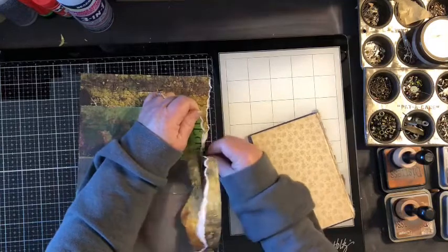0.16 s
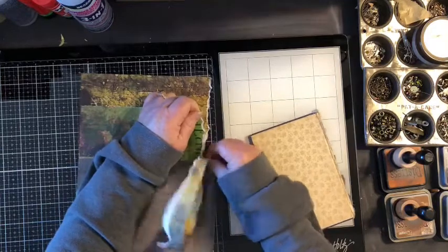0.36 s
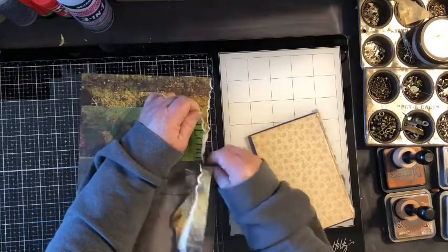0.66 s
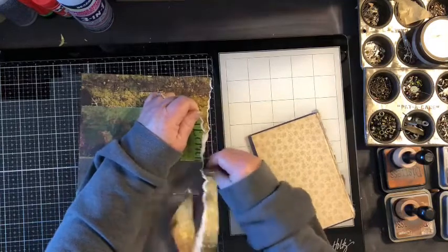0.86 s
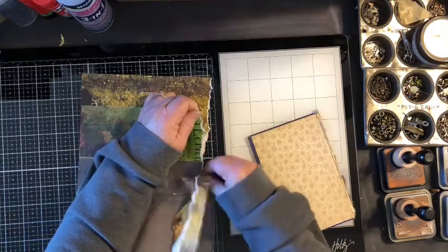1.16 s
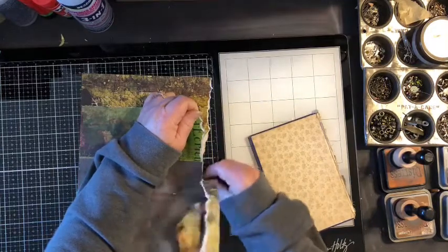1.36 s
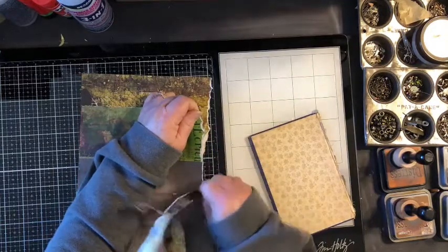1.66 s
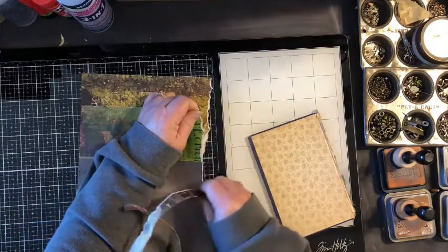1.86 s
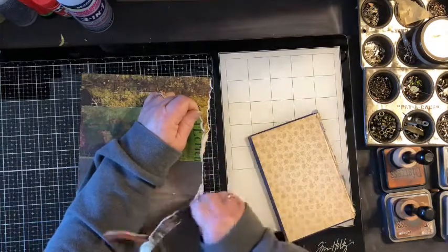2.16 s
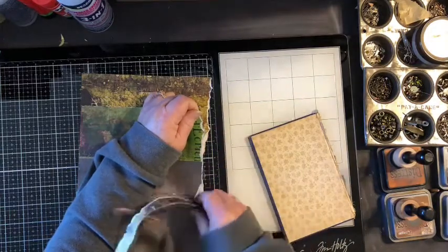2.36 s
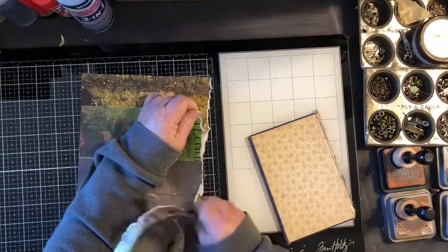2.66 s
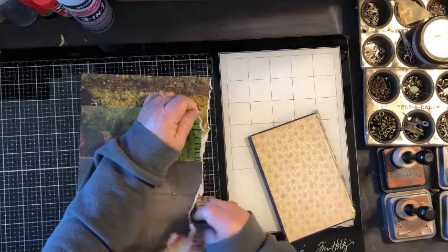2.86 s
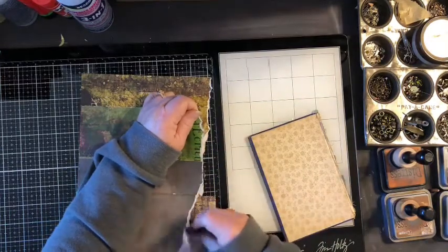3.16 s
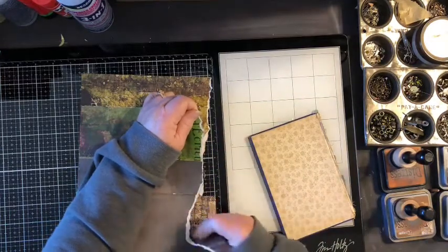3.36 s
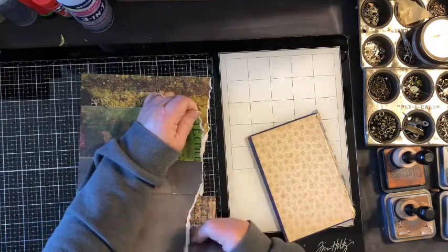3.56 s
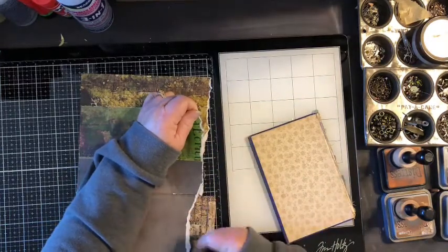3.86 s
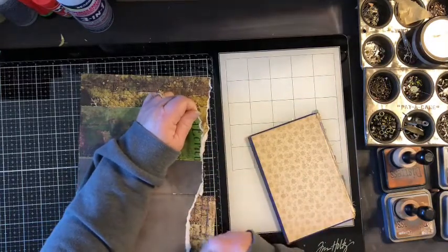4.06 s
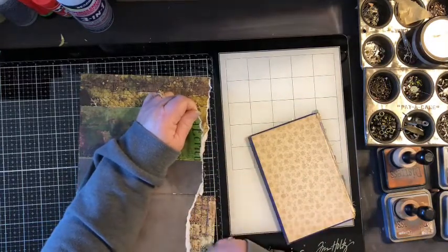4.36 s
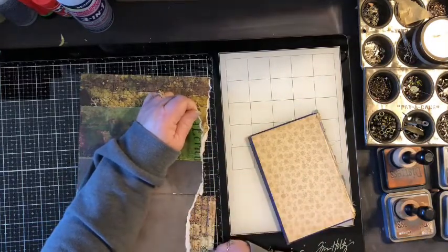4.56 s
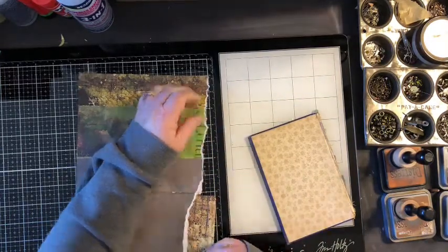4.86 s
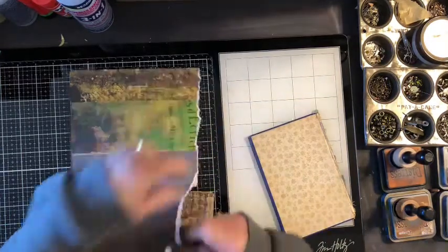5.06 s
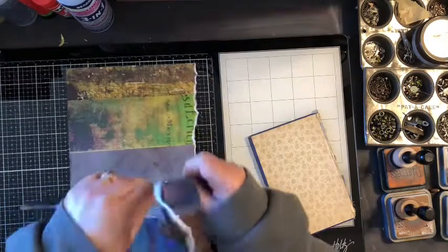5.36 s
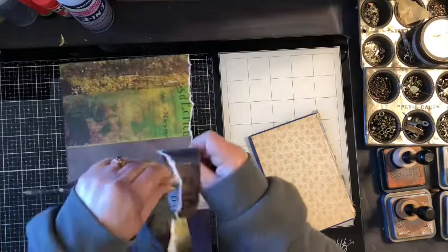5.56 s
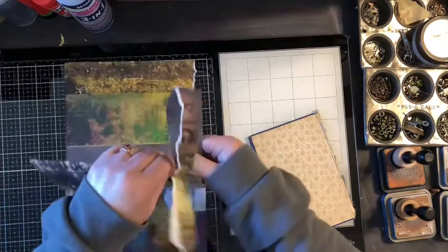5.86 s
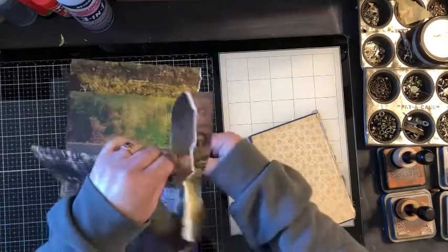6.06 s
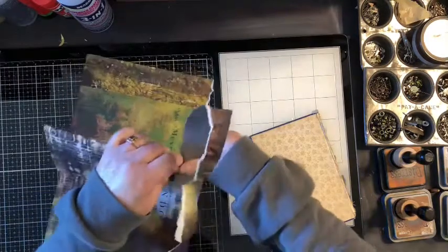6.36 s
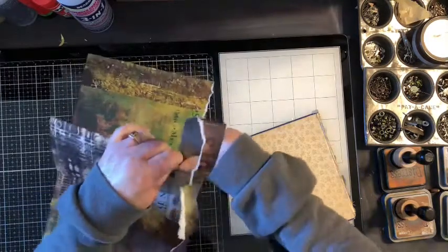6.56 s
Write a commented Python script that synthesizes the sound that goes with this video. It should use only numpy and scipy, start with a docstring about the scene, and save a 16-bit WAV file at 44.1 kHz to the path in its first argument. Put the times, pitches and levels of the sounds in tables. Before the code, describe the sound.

Close up, a strip of stiff paper is torn from a sheet in short irregular pulls. Light rubbing and a few snaps come first, then crisp rips get louder and quicker, ending in a burst of jerks. Afterwards the sheet slides, crinkles and pops softly as it is turned. Small dull room, faint steady low hum, single close microphone.

```python
"""Paper strip torn at a desk

Close by, a strip is torn by hand from a printed sheet on a desk mat, in short pulls; then the sheet is turned.
Tearing and rubbing are random fibre breaks, shaped in bands by each stroke of the hands.
Creases snap as short bursts with a ring; falling chirps are the flaps of the strip and low thumps of the hand.
The small room adds a short dull tail, a low hum of sine tones and faint air noise."""
import sys
import numpy as np
from scipy import signal
from scipy.fft import rfft, irfft, next_fast_len
from scipy.io import wavfile
from scipy.ndimage import uniform_filter1d

SR = 44100
rng = np.random.default_rng(int(sys.argv[2]) if len(sys.argv) > 2 else 0)


def log_audio(samples):
    """Write samples as a 16-bit WAV file to the path given in sys.argv[1]."""
    # one column per channel
    frames = np.atleast_2d(samples).T
    # limit to full scale, then quantise
    limited = np.clip(frames, -1, 1)
    pcm = np.round(limited * 32767).astype(np.int16)
    wavfile.write(sys.argv[1], SR, pcm)


N = 296352
TIME = np.arange(N) / SR

# Boom, crackle and fizz registers, used for tearing and snaps: low_hz, high_hz, bands [count]
REGISTERS = [(130, 1400, 12), (1400, 7000, 12), (7000, 17000, 8)]

# Colour of the paper in each grip: frequency_hz, level_db [relative, per Hz]
SHORT_STRIP = [(150, -9.5), (320, -13.5), (800, -11), (1150, -7), (2800, -2.5), (4500, -2.5), (7000, -2.5),
               (9500, -5), (15000, -4.5)]
LONG_STRIP = [(150, -8), (320, -9), (800, -11), (1300, -4), (3700, 0), (5500, -2.5), (7000, -4),
              (9500, -9.5), (15000, -7)]
SHEET_END = [(150, 0), (320, -6), (900, -4), (1700, -2.5), (3500, -4.5), (4800, -4.5), (6500, -2),
             (9000, -5), (15000, -2.5)]
SLIDING = [(150, -13), (280, -12), (450, -6.5), (800, -8.5), (1500, -4), (4200, -4.5), (6800, -3),
           (9000, -7), (15000, -8.5)]
# How the paper is held: start_s, colour [one of the above], breaks_per_s, size_spread_db,
# stick_slip_db, resonance_db [height of the bent paper's resonance before each register is levelled]
GRIPS = [(0, SHORT_STRIP, 1940, 3.5, 2.5, 8), (1.34, LONG_STRIP, 1640, 3.5, 0.6, 5.5),
         (2.62, SHEET_END, 1800, 4, 0.7, 7), (4.559, SLIDING, 2830, 3, 1.4, 5.5)]


def tearing(octaves, patchy_db):
    """Parting fibres and rubbing paper crackle with the pull, stick and slip, and shift colour with the bend."""
    register_gains, bend_log2_hz = hand_work()
    starts, spectra, *settings = zip(*GRIPS)
    grip = np.searchsorted(starts[1:], TIME)
    breaks_per_s, spread_db, uneven_db, resonance_db = [np.array(column)[grip] for column in settings]
    slips = from_db(uneven_db * (0.21 * drift(70) + 0.34 * drift(300)))
    # the two lips of the tear
    lips = [slips * fibres(breaks_per_s, spread_db, ring_t60=0.019, ring_db=1.5, patches_per_s=22)
            for _ in range(2)]
    out = np.zeros(N)
    # the resonance of the bent paper shares out the power of each register among its bands
    for (low, high, count), register_gain in zip(REGISTERS, register_gains):
        edges = np.geomspace(low, high, count + 1)
        sound, power = 0, 0
        for k, (bottom, top) in enumerate(zip(edges, edges[1:])):
            centre_hz = np.sqrt(bottom * top)
            colour_db = np.array([at_hz(spectrum, centre_hz) for spectrum in spectra])[grip]
            patches_db = patchy_db * drift(30)
            distance = (np.log2(centre_hz) - bend_log2_hz) / octaves
            bend_db = resonance_db * np.exp(-.5 * distance ** 2)
            gain = np.sqrt(top - bottom) * from_db(colour_db + patches_db + bend_db)
            band = rms_one(butter(lips[k % 2], [bottom, top], "band"))
            sound = sound + gain * band
            power = power + gain ** 2
        out += register_gain * sound / np.sqrt(power)
    return out


def fibres(breaks_per_s, spread_db, ring_t60, ring_db, patches_per_s, count=16):
    """Fibres break at random; each break rings the patch of paper that the tip of the tear is passing."""
    sizes = from_db(spread_db * np.minimum(rng.exponential(1, N), 4.5))
    signs = rng.choice([-1, 1], N)
    breaks = sizes * signs * (rng.random(N) < breaks_per_s / SR)
    # the random offset blurs the border between patches
    patch = (TIME * patches_per_s + rng.random(N)).astype(int) % count
    t = TIME[:1024]
    out = np.zeros(N)
    for k in range(count):
        ring = rng.standard_normal(len(t)) * from_db(-60 * t / ring_t60)
        ring *= from_db(ring_db) / np.linalg.norm(ring)
        ring[0] = 1  # the break itself
        out += signal.oaconvolve(breaks * (patch == k), ring)[:N]
    return rms_one(out)


# The tear runs ahead, in long pulls and short jerks: start_s, end_s, level_db [crackle, mid-stroke],
# swell_db [over the stroke], boom_db [re crackle], fizz_db [re crackle], resonance_hz [mid-stroke]
RIPS = [(0.761, 0.862, -54, -1, -5.5, -9.5, 2340), (0.876, 0.972, -51, 0.5, -7.5, -10.5, 2230),
        (1.163, 1.292, -54.5, 2.5, -5.5, -13, 1980), (1.424, 1.748, -49.5, -2, -11, -8.5, 3200),
        (1.798, 1.84, -52, -3, -8, -3, 4000), (1.902, 1.952, -45, -4, -14, -9.5, 3700),
        (1.957, 2.007, -51, 1, -13, -6.5, 3550), (2.013, 2.147, -45.5, -4.5, -16, -9.5, 3400),
        (2.298, 2.328, -47.5, 5.5, -11, -4, 3100), (2.488, 2.548, -45.5, -5, -13.5, -4, 3050),
        (2.774, 2.858, -48.5, 0, -11, -4.5, 2370), (2.874, 2.944, -47.5, 2.5, -9.5, -6.5, 2150),
        (3.185, 3.311, -44.5, -7, -11.5, -4, 2220), (3.54, 3.691, -45.5, -1.5, -13, -3.5, 2660),
        (3.948, 4.005, -42.5, 0, -10, -6, 2420), (4.028, 4.071, -45.5, -2, -11, -4, 3240),
        (4.092, 4.11, -41.5, -2, -13, -3, 3500), (4.133, 4.145, -41, -1.5, -9.5, -2, 3600)]
# Paper slides under the hands and over the mat: start_s, end_s, level_db, swell_db, boom_db, fizz_db,
# resonance_hz [all as for the rips]
RUBS = [(0, 0.02, -54.5, -4, -3, -10, 2100), (0.025, 0.062, -50, -6, -4.5, -6, 1840),
        (0.07, 0.155, -59.5, -5, -5.5, -11.5, 2450), (0.195, 0.362, -59, 6, -7.5, -7, 2600),
        (0.375, 0.44, -68.5, 1, -6, 1, 3060), (0.488, 0.568, -50, -9, -1, -6, 1210),
        (0.662, 0.745, -55.5, -1, -5.5, -1, 4000), (0.995, 1.04, -68, 2, -3, -10, 2300),
        (1.045, 1.15, -56, -1, -6, -2.5, 2100), (1.35, 1.37, -59.5, -6, -9, -6, 4300),
        (1.382, 1.45, -53.5, -9, -14, -3.5, 4300), (1.755, 1.9, -57.5, 5, -7, -5.5, 3800),
        (2.17, 2.28, -55.5, 11, -9.5, -3, 4300), (2.285, 2.475, -54, 6.5, -15, -6.5, 3550),
        (2.555, 2.58, -56, -3, -11, -4, 2800), (2.605, 2.785, -57, 4, -14, -5, 4129),
        (2.96, 3.02, -58, -9, -18, -2, 2867), (3.04, 3.18, -51.5, 9, -14, -3, 4970),
        (3.325, 3.365, -52.5, -6, -9, -10, 1900), (3.405, 3.53, -55, 9, -13, -2.5, 3840),
        (3.695, 3.805, -61, -7, -8, -4.5, 2380), (3.818, 3.945, -52.5, -5, -10, -3.5, 4400),
        (4.16, 4.26, -71, 10, -9, -1.5, 2800), (4.273, 4.515, -54.5, -4.5, -9, -2, 3360),
        (4.525, 4.705, -67, -2, -4, -9, 2930), (4.715, 5.16, -55, 1.5, -8.5, -9, 3140),
        (5.17, 5.23, -59.5, -7, -5, -3, 3800), (5.29, 5.345, -59, -11, -3, -8, 2400),
        (5.362, 5.465, -56, -5.5, -6, -9.5, 3520), (5.51, 5.6, -65, 2, -2.5, -10, 2440),
        (5.605, 5.76, -56.5, 1.5, -9.5, -7, 3960), (5.765, 5.822, -53, 1.5, -10.5, -6, 3770),
        (5.835, 5.94, -59, 1, -8, -12, 4000), (5.95, 6.06, -64, 9, -8, -13, 3040),
        (6.068, 6.347, -56, -6.5, -7, -8, 3370), (6.383, 6.51, -57, -7, -11.5, -11, 3050),
        (6.5, 6.72, -67, 6, -5, -9.5, 2500)]
# How a stroke goes: boom_growth_db, fizz_growth_db, resonance_glide_octaves, jerkiness_db
RIP_SHAPE = (3.5, 0.5, -0.02, 1.5)
RUB_SHAPE = (1.24, -1.3, -0.17, 1.0)
# The held paper never lies quite still: crackle_db, boom_db, fizz_db, resonance_hz
REST = (-72.5, -81, -78, 2399)
JERKS_PER_S = 100  # the paper sticks and jumps ahead
ATTACK_S, RELEASE_S = 0.016, 0.014


def hand_work():
    """Strokes set in, swell or fade, and die; gives boom, crackle and fizz gains and the resonance in log2 Hz."""
    rest_db, rest_boom_db, rest_fizz_db, rest_hz = REST
    power = from_db([[rest_boom_db], [rest_db], [rest_fizz_db]]) ** 2 * np.ones(N)
    weighted_bend = power[1] * np.log2(rest_hz)
    for strokes, shape in ((RIPS, RIP_SHAPE), (RUBS, RUB_SHAPE)):
        boom_growth_db, fizz_growth_db, glide, jerky_db = shape
        jerks = from_db(jerky_db * drift(JERKS_PER_S))
        for start, end, level_db, swell_db, boom_db, fizz_db, hz in strokes:
            near = slice(*np.searchsorted(TIME, [start - ATTACK_S, end + 10 * RELEASE_S]))
            t = TIME[near]
            # runs from -0.5 to 0.5 over the stroke
            progress = np.clip((t - start) / max(end - start, ATTACK_S), 0, 1) - .5
            attack = np.clip((t - start) / ATTACK_S + .5, 0, 1)
            release = np.exp(-(np.maximum(t - end, 0) / RELEASE_S) ** 2)
            level = from_db(level_db + swell_db * progress)
            crackle_power = (attack * release * jerks[near] * level) ** 2
            balance_db = [boom_db + boom_growth_db * progress,
                          0 * t,
                          fizz_db + fizz_growth_db * progress]
            power[:, near] += crackle_power * from_db(balance_db) ** 2
            weighted_bend[near] += crackle_power * (np.log2(hz) + glide * progress)
    # strokes that overlap share the resonance by crackle power
    return np.sqrt(power), weighted_bend / power[1]


# Creases snap: time_s, peak_db [reference for the registers], ring_hz, boom_db [re peak],
# fizz_db [re peak], ring_s [fall by 60 dB; the fizz is scaled by fizz_ring]
SNAPS = [(0.194, -43, 1670, -11.5, -23, 0.02), (0.246, -41, 1170, -13, -27, 0.02),
         (0.461, -30, 1170, -15.5, -25, 0.017), (0.4991, -24.5, 2880, -26, -25, 0.014),
         (0.5116, -31, 1160, -7, -28, 0.041), (0.8829, -34, 2820, -20, -32, 0.021),
         (0.957, -37.5, 2900, -14, -22, 0.031), (0.9697, -33.5, 2700, -24, -26, 0.028),
         (1.0734, -31, 1700, -21, -26, 0.019), (1.197, -33.5, 1760, -16.5, -31, 0.028),
         (1.3435, -42, 4830, -13, -21, 0.019), (1.4521, -36, 4070, -16, -29.5, 0.025),
         (1.5385, -29, 4950, -29, -20, 0.037), (2.3205, -25, 3000, -33, -33, 0.045),
         (2.3715, -32.5, 2770, -17, -28, 0.03), (2.3958, -27, 2780, -30, -32, 0.021),
         (2.4166, -30, 3400, -25, -21, 0.035), (2.4803, -24, 3470, -32, -19, 0.028),
         (2.6682, -38.5, 3340, -20, -23, 0.025), (2.8015, -25.5, 2270, -41, -24, 0.025),
         (3.271, -28.5, 1905, -17.5, -29, 0.029), (3.472, -34, 1830, -8, -19, 0.03),
         (3.5435, -26.5, 3200, -34, -15, 0.023), (3.8592, -35, 3860, -23, -21, 0.029),
         (4.4029, -29.5, 1200, -17, -30, 0.03), (4.424, -27.5, 1800, -44, -10.5, 0.025),
         (4.4806, -32, 1145, -20, -21, 0.015), (4.5062, -38.5, 4200, -19, -13, 0.025),
         (4.6048, -46, 3420, -16, -21, 0.025), (4.6365, -41.5, 3420, -32, -19, 0.025),
         (4.8409, -32.5, 3150, -22, -29, 0.019), (5.012, -35.5, 3620, -17, -25, 0.048),
         (5.1257, -33, 1690, -15, -23, 0.025), (5.1487, -28, 3500, -23.5, -25.5, 0.036),
         (5.1724, -42, 3400, -20, -17, 0.027), (5.2341, -31.5, 4270, -30, -18.5, 0.025),
         (5.2715, -31, 2850, -24, -22, 0.025), (5.2919, -30, 3630, -11, -19.5, 0.02),
         (5.4809, -34, 1025, -14, -27, 0.028), (5.7132, -27, 2880, -31, -39, 0.026),
         (5.9038, -38.5, 3870, -27, -19, 0.025), (6.0921, -38, 2810, -18.5, -29, 0.025),
         (6.2856, -36.5, 4920, -26, -20, 0.022), (6.316, -35, 2150, -29, -18, 0.025),
         (6.3747, -39, 3440, -25.5, -23, 0.012), (6.6114, -41, 3300, -22, -29, 0.023)]
SNAP_CREST_DB = 12  # the crackle register's loudest 3 ms lie this far below peak_db
SNAP_LEAD_S = 0.004


def snaps(rise_s, hold_s, crack_db, fizz_ring):
    """A crease gives way and pops through: a quick crack and a brief ring of the stiff paper round it."""
    out = np.zeros(N)
    t = TIME[:3000] - SNAP_LEAD_S
    rise = np.exp(np.minimum(t, 0) / rise_s)
    for s, peak_db, hz, boom_db, fizz_db, t60 in SNAPS:
        levels_db = (boom_db, -SNAP_CREST_DB, fizz_db)
        for (low, high, _), level_db, stretch in zip(REGISTERS, levels_db, (1, 1, fizz_ring)):
            decay = from_db(-60 * np.maximum(t - hold_s, 0) / max(t60 * stretch, .004))
            pop = rng.standard_normal(len(t)) * decay * rise
            ring = resonance(pop, hz, width_hz=0.082 * hz)
            sound = butter(pop * from_db(crack_db) + ring, [low, high], "band", order=3)
            loudest = np.sqrt(uniform_filter1d(sound ** 2, size=128).max())  # rms over 3 ms
            add(out, s - SNAP_LEAD_S + rise_s, sound / loudest * from_db(peak_db + level_db))
    return out


# The strip flaps, and the hand presses the paper with low thumps: time_s,
# peak_db [of the chirp before its flutter], strongest_hz,
# width_octaves [to one side, standard deviation], flutter_s [fall by 60 dB]
FLAPS_AND_THUMPS = [(0.198, -37, 890, 1.92, 0.11), (0.249, -45.5, 700, 0.76, 0.027),
                    (0.512, -29.5, 780, 0.88, 0.07), (1.137, -45, 754, 0.6, 0.06),
                    (1.861, -52, 220, 1.3, 0.098), (2.295, -47, 606, 1, 0.064),
                    (2.53, -50.5, 420, 0.29, 0.16), (2.817, -44, 330, 0.99, 0.069),
                    (3.272, -49.5, 190, .7, 0.16), (3.324, -42, 170, 1.35, 0.026),
                    (3.406, -46, 160, 1.8, 0.044), (3.473, -44, 800, 2.5, 0.11),
                    (3.602, -44, 261, 1.6, 0.22), (4.403, -37, 740, 0.49, 0.088),
                    (4.482, -43, 820, 0.34, 0.15), (4.685, -54, 298, 1.1, 0.044),
                    (5.125, -40.5, 545, 0.35, 0.036), (5.27, -46, 600, 1.2, 0.083),
                    (5.293, -44.5, 493, 0.21, 0.13), (5.357, -46, 867.8, 1, 0.044),
                    (5.392, -48, 420, 0.37, 0.31), (5.435, -49, 160, 0.5, 0.12),
                    (5.77, -51.5, 387, 0.45, 0.12)]
WAVE_TRAVEL_S = 0.0047  # of a bending wave at 1 kHz along the paper


def flaps_and_thumps(flutter_db, size=8192):
    """Bending waves run faster at high pitch: a flick or press arrives as a falling chirp, then flutters on."""
    out = np.zeros(N)
    hz = np.fft.rfftfreq(size, 1 / SR) + 1  # 1 Hz up, to keep the logarithm finite
    t = TIME[:size]
    # delay after the waves at 6 kHz; it stops growing below 60 Hz
    delay = WAVE_TRAVEL_S * (np.sqrt(1000 / np.maximum(hz, 60)) - np.sqrt(1000 / 6000))
    # phase is the delay summed over frequency
    phase = -2 * np.pi * np.cumsum(np.maximum(delay, 0)) * SR / size
    for s, peak_db, centre_hz, octaves, t60 in FLAPS_AND_THUMPS:
        weight = np.exp(-.5 * (np.log2(hz / centre_hz) / octaves) ** 2)
        chirp = irfft(weight * np.exp(1j * phase))
        flutter = rng.standard_normal(size) * from_db(flutter_db - 60 * t / t60)
        flutter[0] = 1  # the first flick or press
        sound = signal.fftconvolve(chirp / np.abs(chirp).max(), flutter)
        add(out, s, sound * from_db(peak_db))
    return out


# Steady resonances of the paper lying on the desk: pitch_hz, width_hz, level_db [re the paper's own sound]
DESK = [(449, 7.8, -5), (700, 53, -12), (1143, 37, -5.5), (1693, 60, -2), (1960, 46, -13),
        (2810, 130, -9.5), (3670, 750, -14), (5036, 30, -1)]


def on_desk(paper):
    """Paper lying on the desk rings at fixed pitches, added to its own sound."""
    return paper + sum(from_db(db) * resonance(paper, hz, width) for hz, width, db in DESK)


def room(x, t60, wet_db, wall_hz):
    """The direct sound and a short dull tail of decaying noise that starts after 5 ms."""
    t = TIME[:SR // 2]
    walls = butter(rng.standard_normal(len(t)), wall_hz, "low", order=1)
    response = walls * from_db(-60 * t / t60) * (t > .005)
    response *= from_db(wet_db) / np.linalg.norm(response)
    response[0] = 1  # direct path
    return signal.oaconvolve(x, response)[:N]


# Hum tones: pitch_hz, level_db [rms before the waver]
HUM = [(68.8, -58), (87.9, -71), (111.5, -75)]
# Still air of the room: frequency_hz, level_db [relative, per Hz]
AIR = [(22, -48.5), (35, -13), (52, 4), (100, 5.5), (160, 1), (300, -8), (550, -9), (1100, -13.5),
       (3000, -34), (8000, -38), (16000, -59)]
AIR_DB = -66.5  # rms of all the air noise


def hum_and_air(waver_db, wander_rad):
    """Low machine tones that waver a little in level and phase, over soft air noise."""
    hum = np.zeros(N)
    for hz, db in HUM:
        level = from_db(db + waver_db * drift(2.63)) * np.sqrt(2)  # rms to peak
        hum += level * np.sin(2 * np.pi * hz * TIME + wander_rad * drift(1.52))
    air = rms_one(colour(rng.standard_normal(N), AIR))
    return hum + from_db(AIR_DB) * air


def from_db(db):
    """Decibels to gain."""
    return 10 ** (np.asarray(db) / 20)


def rms_one(x):
    """Scale to rms 1."""
    return x / np.sqrt(np.mean(x ** 2) + 1e-20)


def drift(rate):
    """Smooth chance with rms 1: straight lines between random knots, rate of them a second."""
    knots = rng.standard_normal(8192)
    return rms_one(np.interp(TIME * rate, np.arange(len(knots)), knots))


def butter(x, hz, kind, order=2):
    """Causal Butterworth filter."""
    sos = signal.butter(order, np.clip(hz, 10, .45 * SR), kind, fs=SR, output="sos")
    return signal.sosfilt(sos, x)


def at_hz(points, hz):
    """Read a spectrum of (Hz, dB) points on a log-frequency axis."""
    point_hz, point_db = np.array(points).T
    return np.interp(np.log(hz), np.log(point_hz), point_db)


def colour(x, spectrum):
    """Causal (minimum-phase) filter that follows a spectrum of (Hz, dB) points."""
    size = next_fast_len(2 * N, True) // 2 * 2
    curve_db = at_hz(spectrum, np.fft.rfftfreq(size, 1 / SR) + 1)
    # folding the cepstrum onto positive time gives the minimum phase
    cepstrum = irfft(np.log(from_db(curve_db)))[:size // 2]
    cepstrum[1:] *= 2
    response = np.exp(rfft(cepstrum, size))
    return irfft(rfft(x, size) * response)[:N]


def resonance(x, hz, width_hz):
    """One two-pole resonance with gain close to 1 on top."""
    r = np.exp(-np.pi * width_hz / SR)
    zeros = np.array([1, 0, -1]) * (1 - r * r) / 2
    poles = [1, -2 * r * np.cos(2 * np.pi * hz / SR), r * r]
    return signal.lfilter(zeros, poles, x)


def add(track, s, sound):
    """Mix a sound into the track at time s."""
    start = max(round(s * SR), 0)
    track[start:start + len(sound)] += sound[:max(N - start, 0)]


def scene():
    """Paper close by on the desk in the small room, over the hum and air."""
    paper = tearing(octaves=0.63, patchy_db=2.0)
    paper += snaps(rise_s=0.001177, hold_s=0.001, crack_db=-9.5, fizz_ring=0.77)
    paper += flaps_and_thumps(flutter_db=-25.5)
    in_room = room(on_desk(paper), t60=0.17, wet_db=-16.0, wall_hz=4000)
    return (in_room + hum_and_air(waver_db=-0.8, wander_rad=0.9))[None]


CUTOFF_HZ = 15900


def record(dry):
    """One microphone channel: a steep elliptic low-pass cuts the top."""
    sos = signal.ellip(12, .1, 80, CUTOFF_HZ, fs=SR, output="sos")  # 0.1 dB ripple, 80 dB stop
    return signal.sosfilt(sos, dry)


dry = scene()
out = record(dry)
log_audio(out)
```